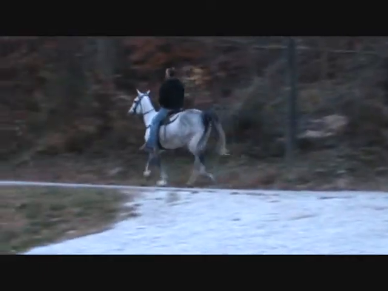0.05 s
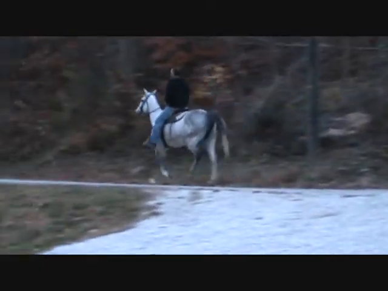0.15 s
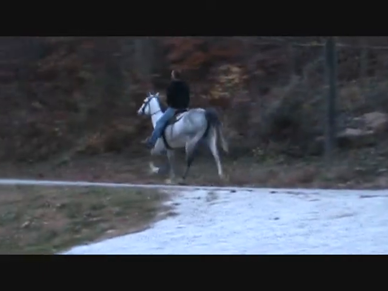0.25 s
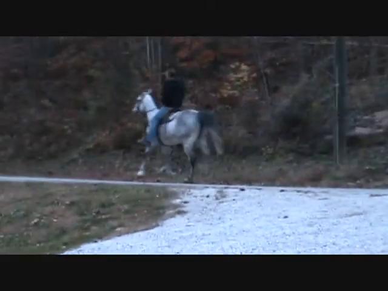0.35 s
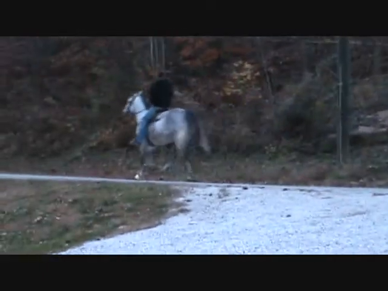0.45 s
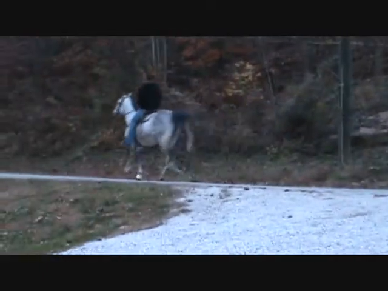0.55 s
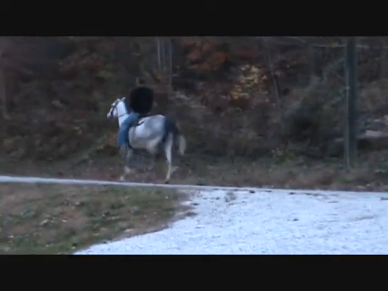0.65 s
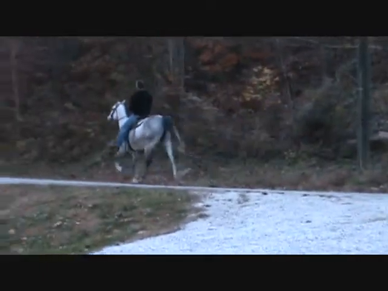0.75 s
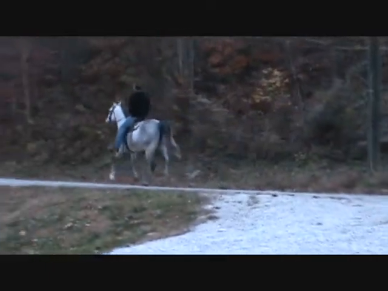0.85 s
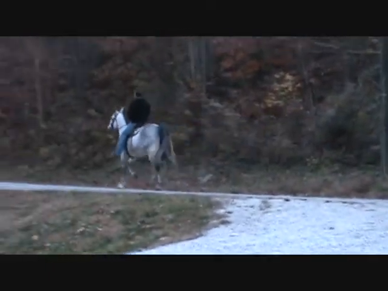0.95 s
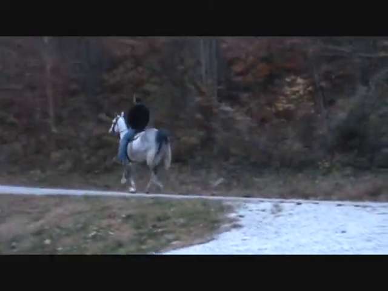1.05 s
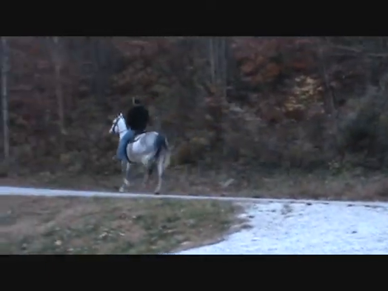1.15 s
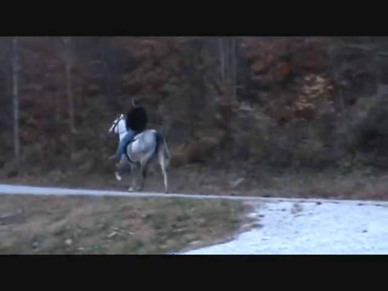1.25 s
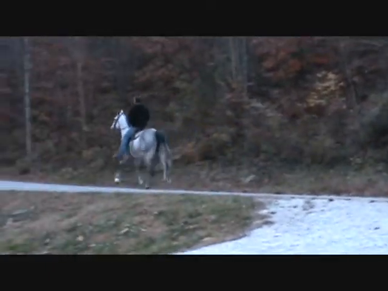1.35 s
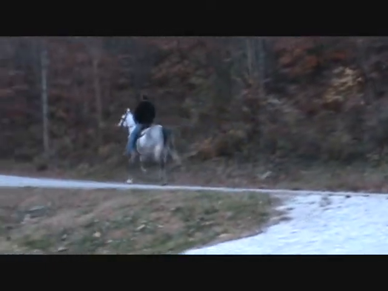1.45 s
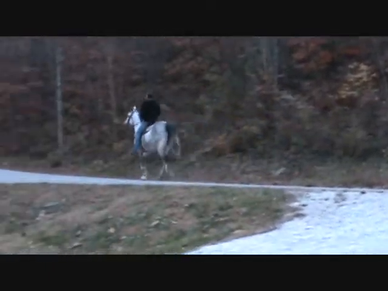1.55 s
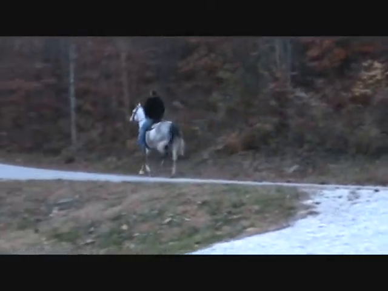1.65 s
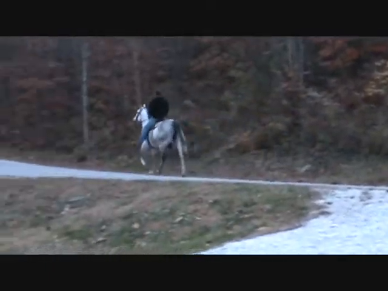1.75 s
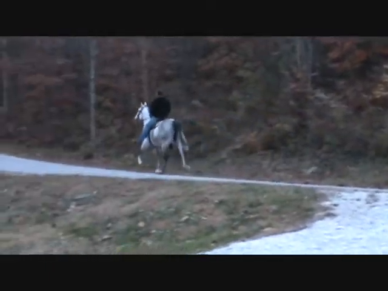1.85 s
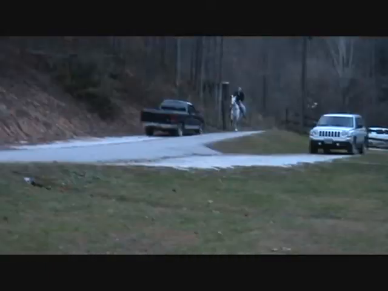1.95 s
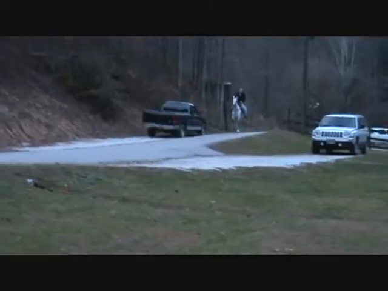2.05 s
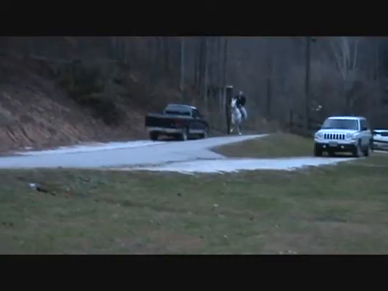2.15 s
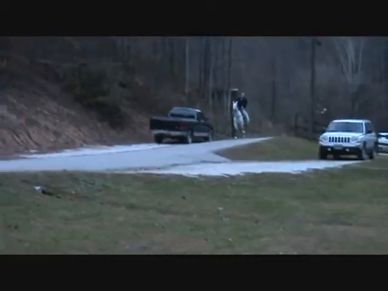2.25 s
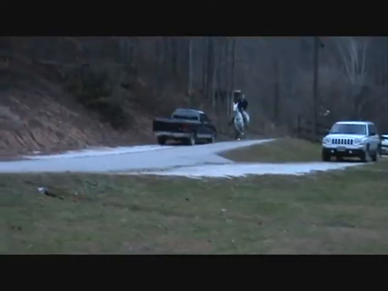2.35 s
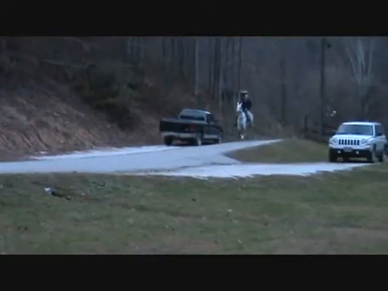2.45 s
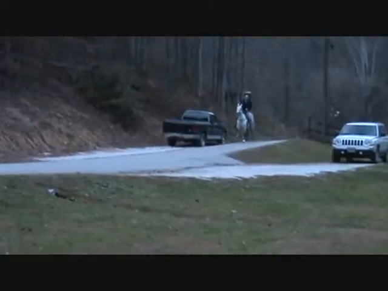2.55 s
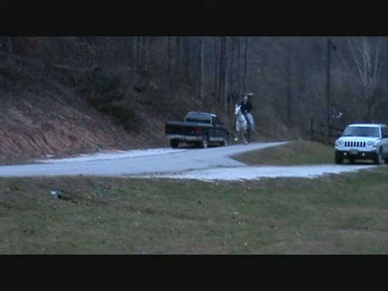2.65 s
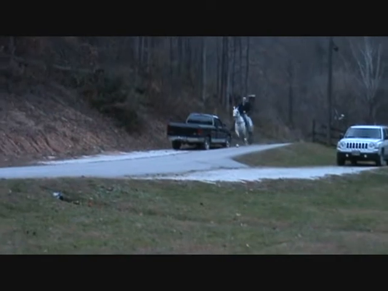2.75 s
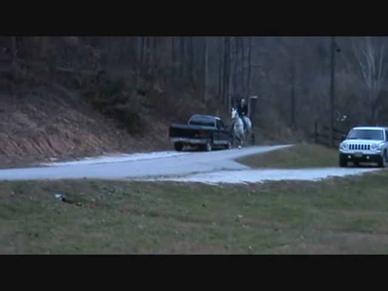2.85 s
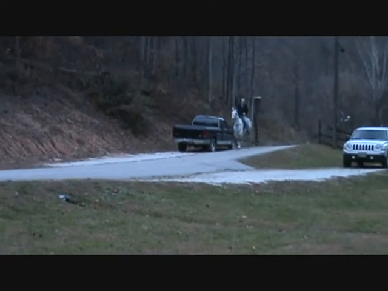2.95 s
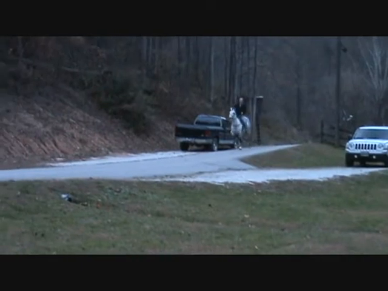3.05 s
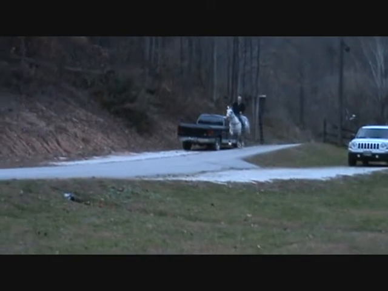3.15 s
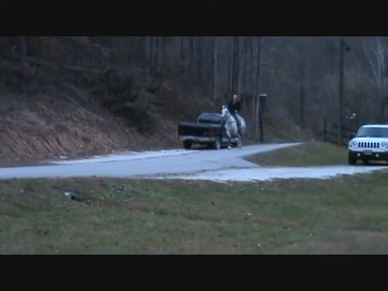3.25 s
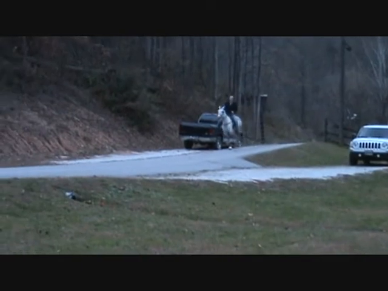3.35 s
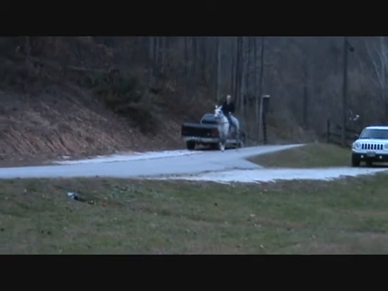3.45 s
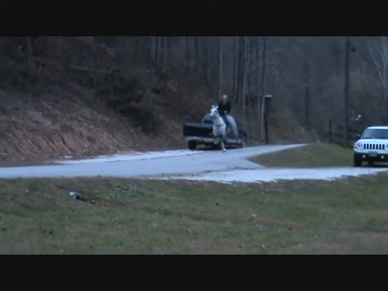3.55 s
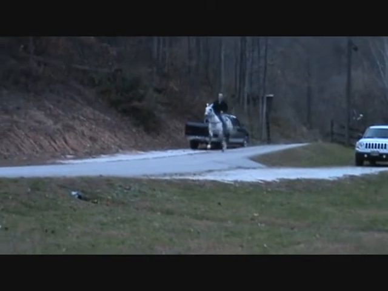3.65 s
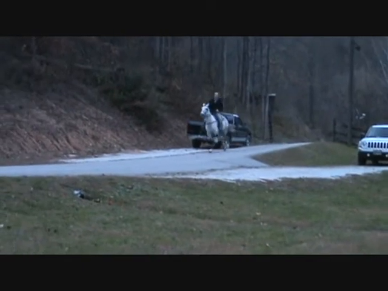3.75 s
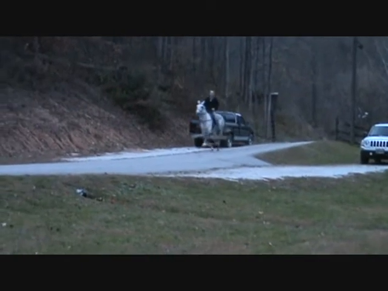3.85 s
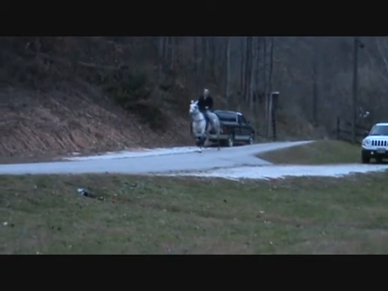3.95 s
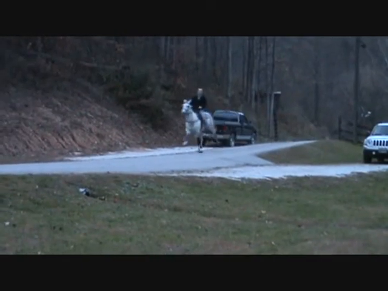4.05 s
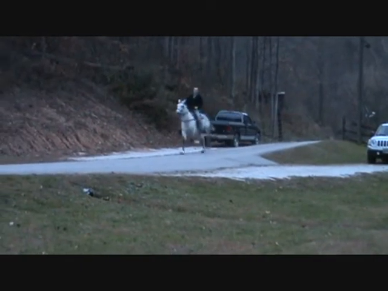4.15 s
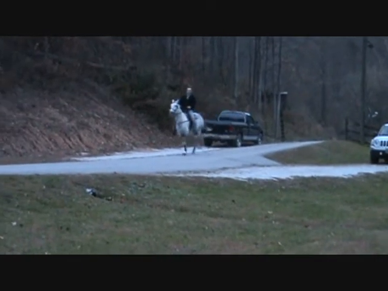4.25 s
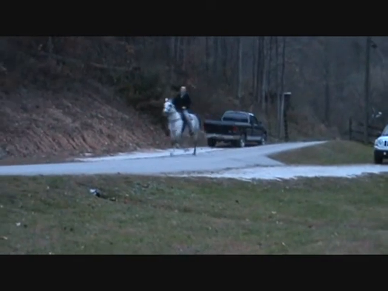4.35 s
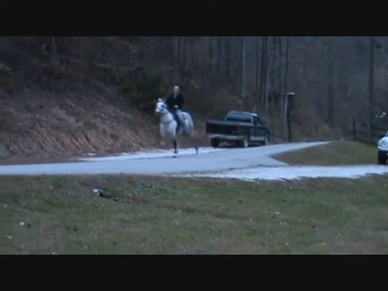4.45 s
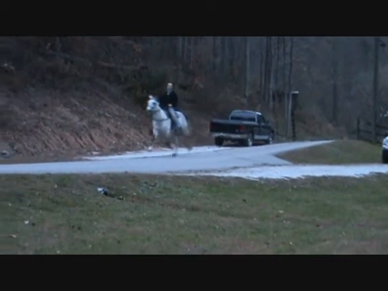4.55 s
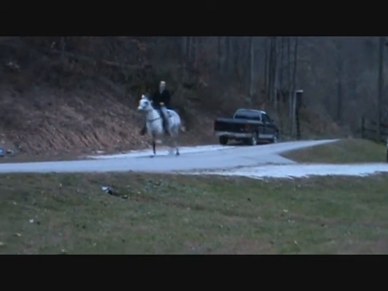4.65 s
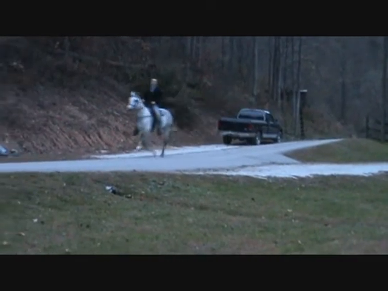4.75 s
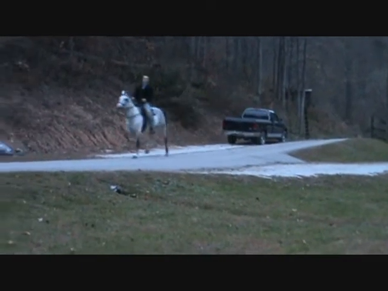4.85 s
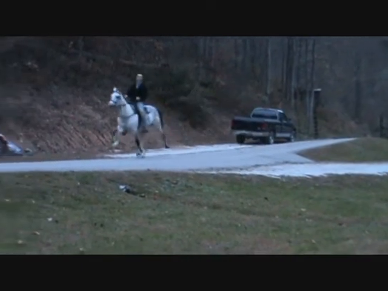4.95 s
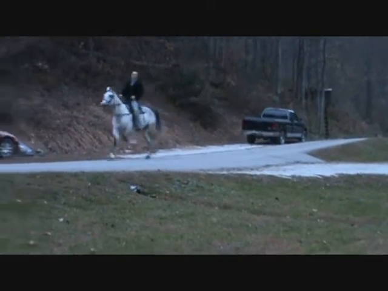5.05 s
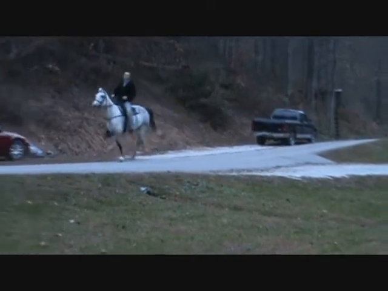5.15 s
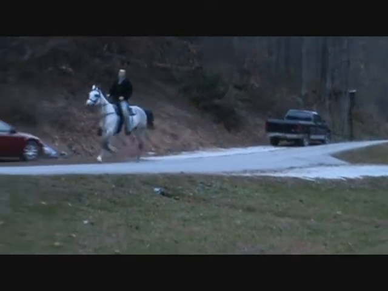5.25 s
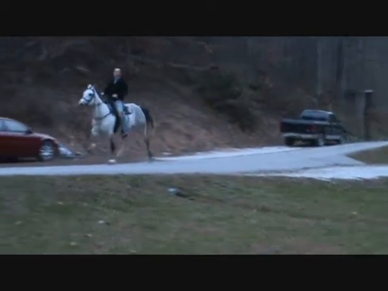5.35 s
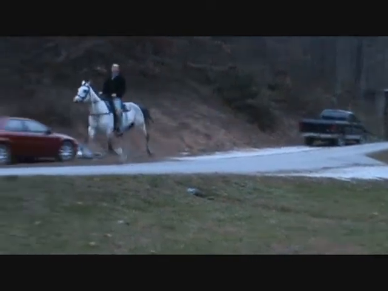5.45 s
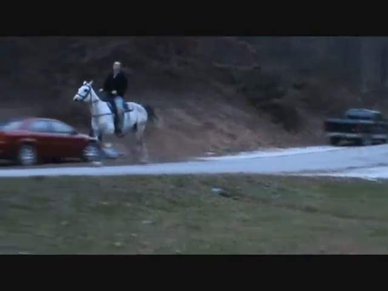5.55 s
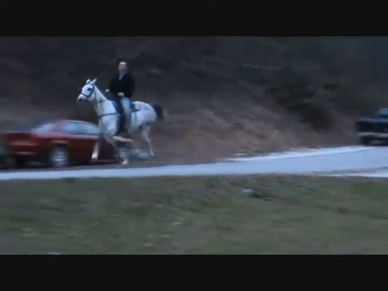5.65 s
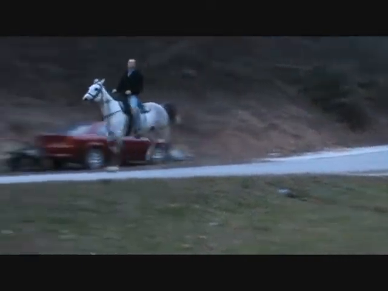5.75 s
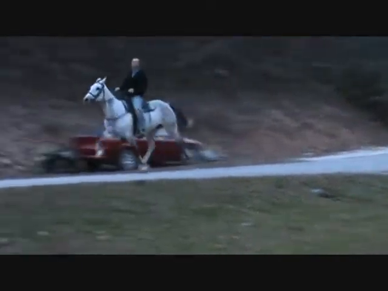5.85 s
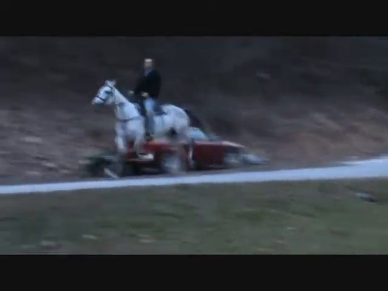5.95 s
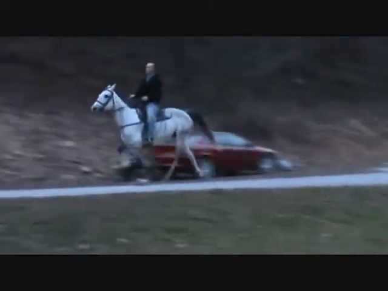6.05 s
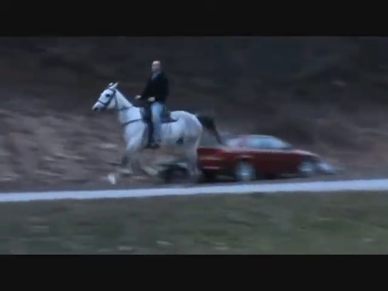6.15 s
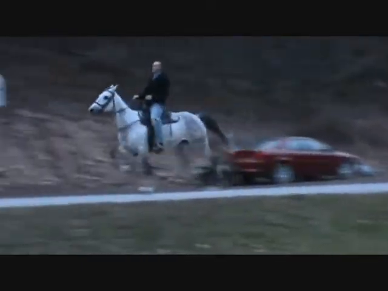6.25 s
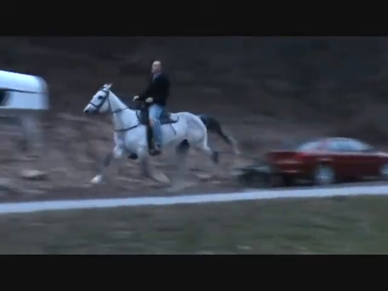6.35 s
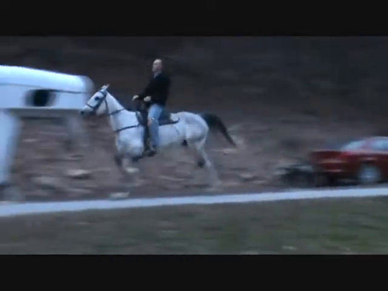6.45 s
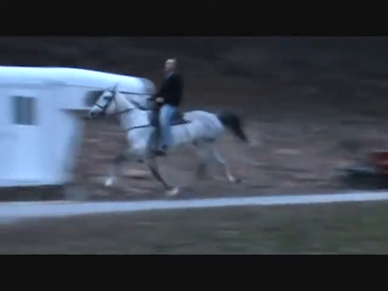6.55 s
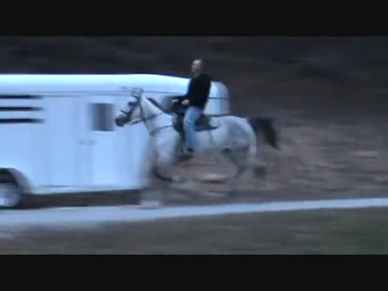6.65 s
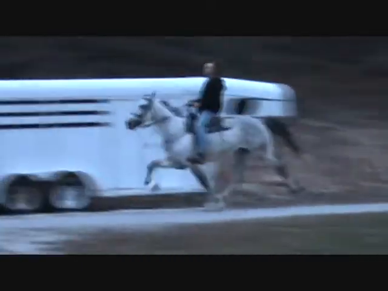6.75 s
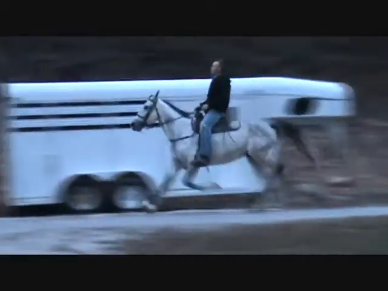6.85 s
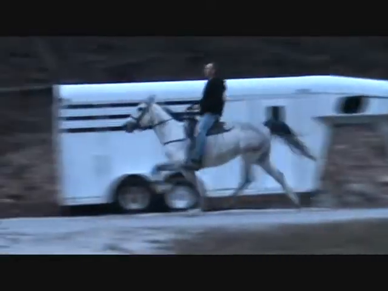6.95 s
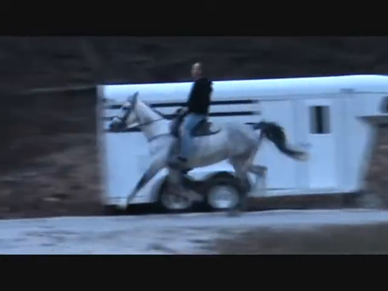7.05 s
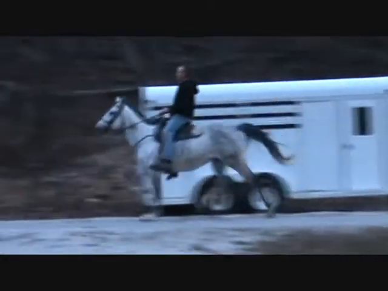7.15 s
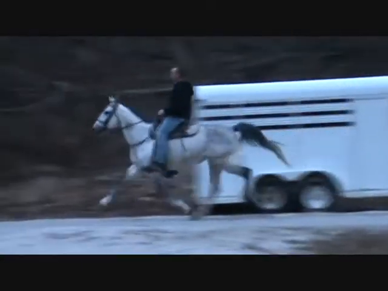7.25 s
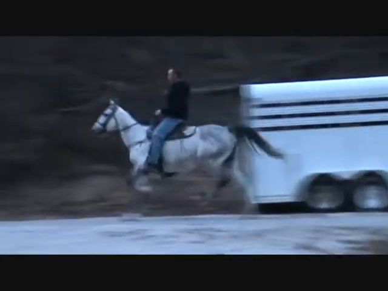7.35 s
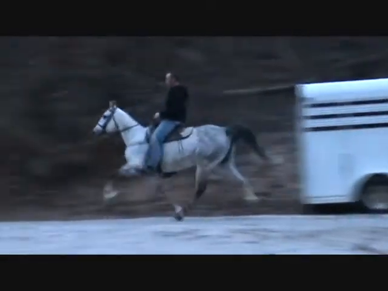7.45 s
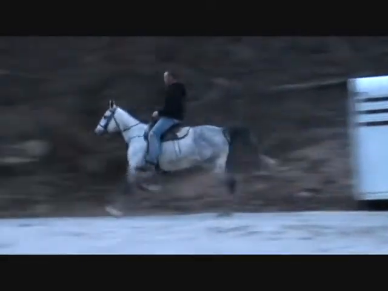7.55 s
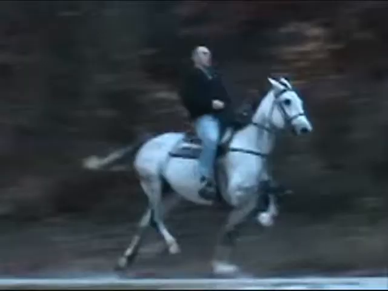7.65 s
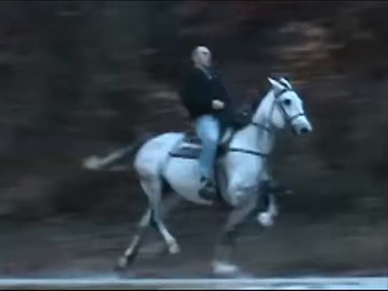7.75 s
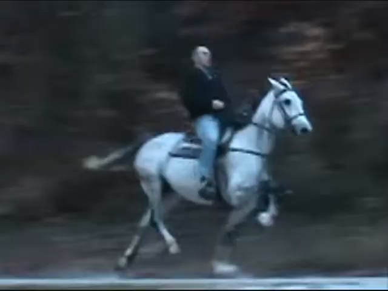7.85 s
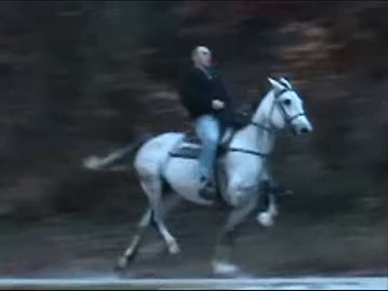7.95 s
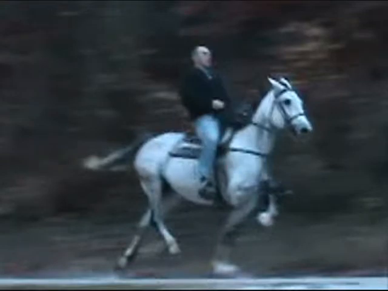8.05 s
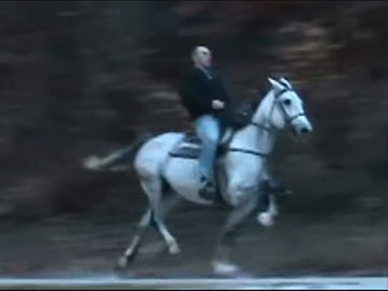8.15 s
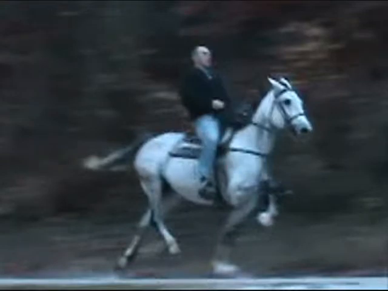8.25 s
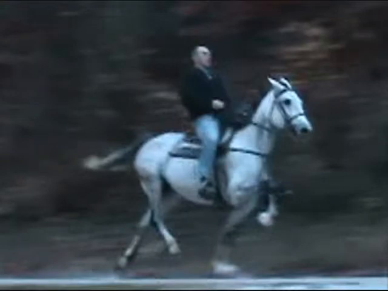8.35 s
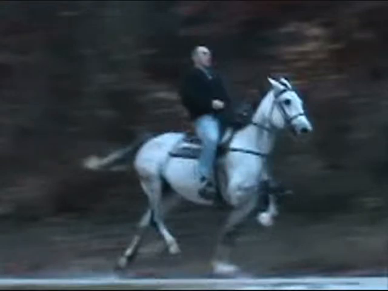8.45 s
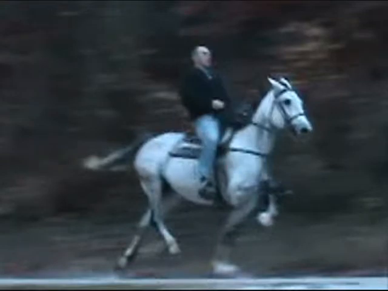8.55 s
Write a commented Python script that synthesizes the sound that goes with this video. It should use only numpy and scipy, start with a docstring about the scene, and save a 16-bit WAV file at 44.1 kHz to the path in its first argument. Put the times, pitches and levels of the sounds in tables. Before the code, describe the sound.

Shod hooves clip-clop away over a faint idling engine, then after a tiny break return fast and ring sharply past on asphalt.

```python
"""Fast hoof beats ring out on asphalt over a far idling engine: a shod horse goes away in a four-beat gait.
After a short break the horse comes back and close past, over outdoor air, and a faint hum swells for a moment.
Each hoof touches with the edge of its iron shoe and slaps flat some ms later: the horn rings, a hollow note
sounds, the road thuds and grit crunches. Scuffs and loose stones fall between the steps.
A wooded bank and a trailer throw the blows back as noise-smeared echoes."""
import sys
import numpy as np
from scipy import signal
from scipy.fft import rfft, irfft, next_fast_len
from scipy.io import wavfile

SR = 44100
rng = np.random.default_rng(int(sys.argv[2]) if len(sys.argv) > 2 else 0)


def bounce(signal):
    """Save signal as a 16-bit WAV file at the path given by the first command-line argument."""
    frames = np.transpose(np.atleast_2d(signal))
    limited = np.clip(frames, -1, 1)
    pcm = np.round(limited * 32767).astype(np.int16)
    wavfile.write(sys.argv[1], SR, pcm)


N = 378819  # length in samples

# Hoof falls, with knock and bite compared to an average step:
# start_s, touch_to_slap_ms, hoof_pitch_hz, hoof_knock_db, iron_bite_db, touch_over_slap_db, thud_db
HOOF_FALLS = [(0.0681, 10.6, 1010, 1, -7.5, -2.5, -38), (0.1903, 3.45, 903, 0.5, -8, -12, -36.5),
              (0.3042, 21, 830, -5.5, -11.5, 10, -39.5), (0.449, 6.3, 950, 2.5, -11.5, 0.5, -40),
              (0.5829, 9, 1030, -2, -14.5, 3.5, -39), (0.7033, 3.8, 900, -4.5, -6, -2, -39.5),
              (0.7951, 19.5, 950, -5.5, -7, 15, -40.5), (0.968, 6.8, 980, 2, -6.5, -23.5, -40.5),
              (1.072, 9.3, 1084, 2, -6.5, 2, -35.5), (1.2252, 7, 1000, -1.5, -7, -11.5, -37.5),
              (1.3265, 13.1, 920, 3, -10, -4.5, -39.5), (1.4758, 7.8, 1033, -6, -9, -13, -52),
              (1.611, 10, 940, -2, -14.5, 6, -42.5), (1.7445, 3.05, 950, -2.5, -7, -3.5, -42),
              (1.8606, 16.8, 910, 2, -10.5, -13, -42), (1.982, 8.2, 887, -3.5, -12, 2.5, -35.5),
              (2.1642, 7.2, 1100, 6, 2.5, 1, -37), (2.2427, 11, 1040, 5, -3, -1, -38),
              (2.4013, 6.2, 1060, -0.5, 5, -4.5, -38), (2.4627, 3.7, 940, 0.5, -1.5, -6.5, -38.5),
              (2.6434, 5.4, 1110, -0.5, 1.5, 0, -38.5), (2.7137, 8.2, 1250, 4, -1, 0, -40),
              (2.8954, 5.3, 1080, 2.0, 5.5, -1, -36), (2.956, 3.95, 960, -3, 6, 3.5, -38),
              (3.109, 4.7, 1160, 1, 0.5, -3.5, -35.5), (3.1825, 9.9, 1150, 1, -4, 7.5, -39.5),
              (3.3596, 5.1, 1060, 1, 2.5, -2.5, -40), (3.4395, 8.6, 980, -1.5, -3.5, 16.5, -40),
              (3.5694, 5.5, 1180, 2.5, 2.5, -9.5, -38), (3.662, 4.05, 1070, -1, -4.5, 0.5, -41.5),
              (3.8058, 5.4, 1240, -0.5, 2, -5, -35), (3.8948, 9.3, 960, -1.5, -4, 17, -38.5),
              (4.0188, 4.4, 1450, 1, -3.5, -3, -35), (4.1186, 4.3, 1120, -2, -3, -2, -33.5),
              (4.255, 3.6, 1200, -4.5, 7.5, 12, -39.5), (4.3377, 8, 1210, 2, -0.5, 0, -37.5),
              (4.46, 4.7, 1660, 1.0, 6.5, -24.5, -34.5), (4.555, 6.9, 1260, 1, 4, 1, -37),
              (4.698, 6.5, 1150, 1.5, 8, -11.5, -35.5), (4.777, 8.1, 1190, 0.5, 4.5, 6.5, -31),
              (4.9051, 5.8, 1156, 1.5, 2.5, -3, -29.5), (4.9879, 6.3, 1350, 2, 1, 2, -31),
              (5.143, 7.2, 1220, -1.5, 7.0, -2.5, -34.5), (5.2207, 3.8, 1100, 2.5, 0.5, 3.5, -37.5),
              (5.3569, 6.5, 1256, 0, 4.5, -10, -31.5), (5.4271, 4.04, 1210, 0, 4.5, -8.5, -31.5),
              (5.6067, 4.44, 1100, 3, 3.5, 5, -34.5), (5.6733, 4.25, 1030, 1.5, 3, 0.5, -32),
              (5.8145, 4.9, 1070, 0, -2, -11.5, -28), (5.88, 4.5, 1130, -3, -0.5, 1.5, -33.5),
              (6.0548, 5.7, 954, 0, 1, -0.5, -36.5), (6.1104, 8.2, 646, 1.5, -1.5, 3, -31),
              (6.2566, 6.4, 1060, 0, -3, -1, -27), (6.3294, 4.0, 1070, -5, -2.5, 11.5, -40.5),
              (6.4867, 6, 1120, -2, 1, 9.5, -37.5), (6.5624, 9.3, 960, 1.5, -1, 5, -29),
              (6.701, 4.7, 1046, -3, 1, -6.5, -26.5), (6.781, 5.2, 1183, -2.5, -0.5, 1, -29.5),
              (6.9406, 6, 1010, 0.5, 0.5, -3.5, -36), (7.0134, 7.2, 930, -3.5, -3, 7.5, -28),
              (7.153, 6.8, 1126, -1, -4.5, -6.5, -29), (7.247, 5.2, 1020, -1, -2.5, 14.5, -30.5),
              (7.3798, 7.7, 974, -0.5, 0.0, -11, -32), (7.4656, 7.6, 880, 1.5, -6, 11, -38),
              (7.6067, 6.3, 1037, 1.5, -2.5, 3.5, -35.5), (7.702, 5.15, 950, 1, -3.5, 6, -33)]
# Ringing of the horn wall: multiple_of_hoof_pitch, level_db, t60_s
HORN_MODES = [(.8, -5.5, 0.013), (1.0, -2, 0.021), (1.14, -1.5, 0.014), (1.36, 2, 0.0056)]
# Broad resonances of iron on stone: pitch_hz, width_hz, level_db
IRON_MODES = [(2184, 630, 3), (4250, 1600, 1), (6330, 1170, 2), (9150, 11000, -9)]
# Distance of the horse, away and then back: time_s, distance_m
HORSE_PATH = [(0, 15.9), (2.0, 23.7), (2.1, 74), (3.7, 36), (4.4, 28.8), (5.3, 25.3), (6.1, 13.9),
              (7.2, 9.6), (7.75, 12.7)]
# Soft rubs and bumps between the steps: middle_s, length_s, scuff_db, bump_db
SCUFFS = [(3.304, 0.085, -38, -38.5), (4.191, 0.065, -35, -30.5), (6.031, 0.035, -30, -34),
          (6.186, 0.021, -35.5, -55), (6.668, 0.029, -28, -30.5), (7.328, 0.041, -29.5, -30.5),
          (7.367, 0.033, -28.5, -34.5)]
# Stones kicked loose that strike the road: start_s, level_db
LOOSE_STONES = [(0.775, -46), (4.721, -30), (5.633, -34), (7.633, -32.5)]
# The bank and the trailer: from_s, until_s, lag_ms, echo_db, top_hz, smear_t60_s
BIG_SURFACES = [(0, 2, 22, -14, 1330, 0.13), (6.65, 7.42, 16, -5, 2313, 0.028)]
# Late echo of woods and bank: pitch_hz, level_db, t60_s
WOOD_ECHO = [(219.3, 0, 0.3), (475, 4.5, 0.31), (1000, 4, 0.084), (4700, 0, 0.44), (9000, 1.5, 0.34)]
# Tone colour of the outdoor air: pitch_hz, level_db (per Hz)
AIR_COLOUR = [(12, -49.5), (28, -8.5), (145, -0.5), (300, -8), (490, -12.5), (780, -1.5), (1030, 4),
              (1800, -6), (5000, -14), (10000, -23.5)]
# Air level before its flutter, louder as the horse comes near: time_s, rumble_db, rustle_db
AIR_LEVELS = [(0, -53, -50.5), (1.9, -55, -49.5), (3.7, -53.5, -47.5), (4.301, -50, -44),
              (6.399, -47, -41.5), (6.701, -42, -34.5), (7.05, -47.5, -43.5), (7.4, -43.5, -41),
              (7.751, -49.5, -40.5)]
# Flutter of the air: rumble_db, rustle_db
AIR_FLUTTER = (3.5, 1.6)
# Rise and fall of the hum: time_s, level_db
HUM_LEVEL = [(4.5, -60), (4.75, -37.5), (4.9, -52)]
# Edges of the hum's narrow band: low_hz, high_hz
HUM_BAND = [1055, 1165]
# Tones of the idling engine: multiple_of_firing_rate
ENGINE_TONES = [2, 3, 4, 6]
# Left against right at the microphone pair: pitch_hz, left_minus_right_db, left_lead_radians
MICROPHONE_PAIR = [(60, 0.3, -.2), (320, -0.8, -0.57), (1150, -1.5, -0.66), (2400, 0.5, -0.44),
                   (6000, 1.4, -0.06)]
# Overall level, with the break and the end: time_s, gain_db
LEVEL_CURVE = [(1.995, 2), (2.0, -11), (2.035, -37), (2.1, -33), (2.125, -0.5), (7.758, 1), (7.768, -24.5),
               (7.87, -100)]

TIME = np.arange(N) / SR
AGE = np.arange(4096) / SR  # seconds since a contact; short sounds end after this
FFT_SIZE = next_fast_len(N, True)
BIN_HZ = np.fft.rfftfreq(FFT_SIZE, 1 / SR)
BREAK_S = 2.02  # away before this, back after it
NEAR_M = 10  # distance at which the step levels are given
RING_DB, IRON_DB, HOLLOW_DB = -22, -20, -31  # an average step
CLEAR_HZ = 27500  # treble limit of the iron at NEAR_M, falling as 1 / distance
HOLLOW_REACH_M = 17.5  # beyond this distance the ground swallows the hollow note
HOLLOW_LOSS = 2.3  # power of 1 / distance of that loss
AWAY_HOLLOW_DB = -16  # the hollow note is weaker from behind
HOLLOW_DETUNE, HOLLOW_T60_S = .09, .014  # pitch spread (share of pitch), brief decay
MODE_DETUNE, MODE_SPREAD_DB = .03, 2  # spread of each horn mode: share of its pitch, dB
GRAINS_PER_S, GRAIN_SPREAD_DB, GRAIN_T60_S = 190, 5.5, .005  # grit under the shoe
ENGINE_DB, FIRING_HZ = -58, 45.6  # typical peak of each tone, average firing rate


def from_db(db):
    """Turn decibels into gain."""
    return 10 ** (np.asarray(db) / 20)


def to_db(gain):
    """Turn gain into decibels."""
    return 20 * np.log10(gain)


def rms_one(x):
    """Scale to an rms of one."""
    return x / np.sqrt(np.mean(x ** 2) + 1e-30)


def at_level(x, db):
    """Scale a short sound so that its energy, spread over 10 ms, has this level."""
    energy = np.sum(x ** 2) + 1e-30
    return x * from_db(db) * np.sqrt(.01 * SR / energy)


def in_time(rows):
    """Read each column of a time curve at every sample."""
    s, *columns = np.transpose(rows)
    return [np.interp(TIME, s, c) for c in columns]


def at_hz(rows, hz):
    """Read each column of a pitch table, spaced by musical intervals."""
    f, *columns = np.transpose(rows)
    return [np.interp(np.log(hz + 1e-9), np.log(f), c) for c in columns]


def cut(x, hz, kind, order=2):
    """Keep part of the spectrum with a Butterworth filter."""
    safe_hz = np.clip(hz, 10, .45 * SR)
    return signal.sosfilt(signal.butter(order, safe_hz, kind, fs=SR, output="sos"), x)


def dying(t60):
    """Fade that falls 60 dB in t60 seconds."""
    return np.exp(-np.log(1000) * AGE / t60)


def ring(hz, t60):
    """A struck body sounds one pure tone that dies away."""
    return np.sin(2 * np.pi * hz * AGE) * dying(t60)


def burst(t60):
    """Noise that dies away."""
    return rng.standard_normal(len(AGE)) * dying(t60)


def flicker(hz):
    """Random wandering slower than hz, with an rms of one."""
    return rms_one(cut(rng.standard_normal(N), hz, "low"))


def add(track, s, sound):
    """Mix a sound in at time s."""
    i = max(round(s * SR), 0)
    track[i:i + len(sound)] += sound[:N - i]


def hooves(grit_db=-11.0, edge_ring_db=-3.5, edge_follows=0.35, edge_t60=0.0088, hollow_hz=605,
           away_thud_hz=195, toward_thud_hz=120, skid_db=-8.0, spray_db=-15, spray_s=0.091, spray_t60=.3):
    """The four feet land in turn: each step is a bright touch, then a flat, hollow slap."""
    out = np.zeros(N)
    for s, roll_ms, hz, knock_db, bite_db, edge_db, thud_db in HOOF_FALLS:
        metres = np.interp(s, *np.transpose(HORSE_PATH))
        spread_db = to_db(NEAR_M / metres)
        away = s < BREAK_S
        flat = s + roll_ms / 1000  # moment of the slap
        horn = capsule(hz)

        # touch and slap share the energy of the iron
        edge = from_db(edge_db)
        shares = np.array([edge, 1]) / np.hypot(edge, 1)
        touch_db, slap_db = IRON_DB + bite_db + spread_db + to_db(shares)
        hardest_db = max(touch_db, slap_db)

        # air dulls the iron and grit with distance
        bright_sounds = [click(), click(), grit(), grit(spray_t60)]
        touch, slap, crunch, spray = cut(bright_sounds, CLEAR_HZ * NEAR_M / metres, "low")

        edge_ring = ring(hz * 0.95, edge_t60)
        edge_ring_level = touch_db + edge_ring_db + edge_follows * spread_db
        add(out, s, at_level(touch, touch_db) + at_level(edge_ring, edge_ring_level))
        add(out, flat, at_level(slap, slap_db) + at_level(horn, RING_DB + knock_db + spread_db))

        far_loss_db = HOLLOW_LOSS * min(to_db(HOLLOW_REACH_M / metres), 0)
        hollow_db = HOLLOW_DB + far_loss_db + away * AWAY_HOLLOW_DB
        add(out, flat, at_level(hollow(hollow_hz), hollow_db))
        add(out, flat, at_level(thud(away_thud_hz if away else toward_thud_hz), thud_db))
        # the most hollow, loudly knocking landings skid the most
        add(out, flat + 0.0066, at_level(skid(horn), hollow_db + skid_db + knock_db))
        # a hard, heavy step crushes more grit
        add(out, flat + 0.0016, at_level(crunch, (hardest_db + thud_db) / 2 + grit_db))
        # pushing off, the hoof scatters small stones
        push_off = flat + spray_s * rng.uniform(0.85, 1)
        add(out, push_off, at_level(spray, hardest_db + spray_db))
    return out


def capsule(hz, low_ratio=0.63):
    """The horn wall rings; the point of contact shifts the pitch and strength of each mode."""
    rings = 0
    for k, (ratio, db, t60) in enumerate(HORN_MODES):
        strength_chance, pitch_chance = rng.standard_normal(2)
        gain = (-1) ** k * from_db(db + MODE_SPREAD_DB * strength_chance)
        pitch = hz * ratio * (1 + MODE_DETUNE * pitch_chance)
        rings = rings + gain * ring(pitch, t60)
    return cut(rings, hz * low_ratio, "high")  # little sounds below the lowest mode


def click(chatter_db=-17, chatter_t60=0.054, crack_t60=0.0054, rock_db=-9, rock_s=0.0039):
    """The shoe cracks onto a stone, rocks onto the next and chatters briefly on loose grit."""
    crack = shoe(burst(crack_t60))
    rock = np.roll(shoe(burst(crack_t60)), int(rng.random() * rock_s * SR))
    return crack + from_db(rock_db) * rock + from_db(chatter_db) * grit(chatter_t60)


def shoe(force, low_hz=1300):
    """Contact force excites the broad resonances of iron on stone."""
    out = 0
    for k, (hz, width, db) in enumerate(IRON_MODES):
        radius = np.exp(-np.pi * width / SR)  # a wider resonance dies sooner
        angle = 2 * np.pi * hz * np.exp(rng.normal(0, 0.09)) / SR
        gain = (-1) ** k * from_db(db) * (1 - radius * radius)
        feedback = [1, -2 * radius * np.cos(angle), radius * radius]
        out = out + gain * signal.lfilter([1, 0, -1], feedback, force)
    return cut(out, low_hz, "high", order=1)


def grit(t60=0.052):
    """Stones crushed under the shoe give short cracks, softer as it settles."""
    size_chance = np.minimum(rng.exponential(1, len(AGE)), 4)
    cracks = rng.random(len(AGE)) < GRAINS_PER_S / SR
    sizes = from_db(GRAIN_SPREAD_DB * size_chance) * cracks
    pressure = signal.lfilter([1], [1, -dying(GRAIN_T60_S)[1]], sizes)  # each crack dies quickly
    return shoe(burst(t60) * pressure)


def hollow(hz):
    """Air trapped under the sole rings below the horn."""
    pitch = hz * (1 + HOLLOW_DETUNE * rng.standard_normal())
    return cut(ring(pitch, HOLLOW_T60_S), 590, "high", order=4)


def thud(low_hz, high_hz=350, push_t60=0.06, shake_db=3.0, shake_t60=0.054):
    """The weight lands: one push, with a short shudder of leg and road."""
    push = cut(dying(push_t60), [low_hz, high_hz], "band")
    shake = cut(burst(shake_t60), [low_hz, high_hz], "band")
    return at_level(push, 0) + at_level(shake, shake_db)


def skid(horn, slips_per_s=700, t60=0.064):
    """The hoof slides a little on the road; each small slip rings the horn again."""
    slips = burst(t60) * (rng.random(len(AGE)) < slips_per_s / SR)
    return signal.fftconvolve(slips, horn)[:len(AGE)]


def scuffs(low_hz=600, high_hz=1300, sand_db=-5.0):
    """Swelling rubs over coarse grit, with a low bump, between the hoof beats."""
    out = np.zeros(N)
    for s, length, scuff_db, bump_db in SCUFFS:
        swell = np.sin(np.pi * np.minimum(AGE / length, 1))
        rub, bump = rng.standard_normal((2, len(AGE))) * swell
        sand = (grit(0.86) + grit(0.93)) * swell
        sound = at_level(cut(rub, [low_hz, high_hz], "band"), scuff_db)
        sound = sound + at_level(sand, scuff_db + sand_db)
        sound = sound + at_level(cut(bump, [110, 195], "band"), bump_db)
        add(out, s - length / 2, sound)
    return out


def stones(t60=0.017):
    """Single loose stones click on the road as short bursts with the shoe's resonances."""
    out = np.zeros(N)
    for s, db in LOOSE_STONES:
        add(out, s, at_level(shoe(burst(t60)), db))
    return out


def reflections(x):
    """Each large surface returns a smeared copy of every blow while the horse is opposite it."""
    out = np.zeros(N)
    for s, *_ in HOOF_FALLS:
        for start, end, lag_ms, db, top_hz, smear_t60 in BIG_SURFACES:
            if start < s < end:
                blow = x[int(s * SR):][:SR // 40]  # 25 ms of sound
                scatter = burst(smear_t60)
                smeared = signal.fftconvolve(blow, scatter / np.linalg.norm(scatter))
                add(out, s + lag_ms / 1000, from_db(db) * cut(smeared, top_hz, "low"))
    return out


def woods(x, near_db=6.0, near_t60=0.029, count=24):
    """Echoes, quick off the verge and later off the trunks; each stretch of road has its own paths."""
    age = TIME[:SR // 3]
    edges = 70 * 2 ** np.arange(0, 7.6, .5)  # half-octave bands, Hz
    out = np.zeros(N)
    for stretch in np.array_split(np.arange(N), count):
        echo = 0
        for band in zip(edges, edges[1:]):
            db, t60 = at_hz(WOOD_ECHO, np.sqrt(np.prod(band)))
            trunks = from_db(-60 * age / t60)
            verge = from_db(near_db - 60 * age / near_t60)
            paths = (trunks + verge) * rng.standard_normal(len(age)) * (age > .003)
            echo = echo + from_db(db) * cut(paths / np.linalg.norm(paths), band, "band")
        add(out, stretch[0] / SR, signal.fftconvolve(x[stretch], echo))
    return out


def air(split_hz=480, flutter_hz=40):
    """Coloured noise makes a low outdoor rumble and an uneven rustle."""
    spectrum = rfft(rng.standard_normal(FFT_SIZE)) * from_db(at_hz(AIR_COLOUR, BIN_HZ)[0])
    noise = irfft(spectrum, FFT_SIZE)[:N]
    out = 0
    for db, flutter_db, kind in zip(in_time(AIR_LEVELS), AIR_FLUTTER, ["low", "high"]):
        part = rms_one(cut(noise, split_hz, kind, order=4))
        out = out + from_db(db + flutter_db * flicker(flutter_hz)) * part
    return out


def hum():
    """A narrow band of noise swells and sinks after the break, like tyres on a far road."""
    tone = rms_one(cut(rng.standard_normal(N), HUM_BAND, "band", order=1))
    return (TIME > BREAK_S) * from_db(in_time(HUM_LEVEL)[0]) * tone


def engine(waver=0.0035, uneven_db=2):
    """A far idle before the break: low multiples of an unsteady firing rate, each swelling and sinking."""
    turns = np.cumsum(FIRING_HZ * (1 + waver * flicker(2))) / SR
    out = 0
    for k in ENGINE_TONES:
        gain = from_db(ENGINE_DB + uneven_db * flicker(2))
        out = out + gain * np.sin(2 * np.pi * k * turns)
    return (TIME < BREAK_S) * out


def ports(mid, side):
    """The microphone pair sets left and right apart in level and phase, mostly in the low mids."""
    balance_db, lead = at_hz(MICROPHONE_PAIR, BIN_HZ)
    sign = np.array([[1], [-1]])  # left, right
    level = from_db(sign * balance_db / 2)
    phase = np.exp(.5j * sign * lead) / np.cos(lead / 2)  # the division makes up for the phase split
    return irfft(rfft(mid, FFT_SIZE) * level * phase, FFT_SIZE)[:, :N] + sign * side


def scene(woods_db=-11, woods_side_db=-18.0, air_side_db=-13):
    """Horse, echoes and outdoor background meet at the microphone pair."""
    horse = hooves() + scuffs() + stones()
    echoes = reflections(horse) + from_db(woods_db) * woods(horse)
    mid = horse + echoes + air() + hum() + engine()
    side = from_db(woods_side_db) * woods(horse) + from_db(air_side_db) * air()
    return ports(mid, side)


def record(dry, treble_hz=10100, hiss_db=-61, cutoff_hz=16200):
    """Peaks are rounded, the treble rolls off onto faint hiss, the sound is faded and the top is cut."""
    rounded = .65 * np.tanh(dry / .65)
    hiss = from_db(hiss_db) * rng.standard_normal((2, N))
    wet = cut(rounded, treble_hz, "low", order=12) + hiss
    faded = wet * from_db(in_time(LEVEL_CURVE)[0])
    return signal.sosfilt(signal.ellip(10, .1, 80, cutoff_hz, fs=SR, output="sos"), faded)


dry = scene()
out = record(dry)
bounce(out)
```